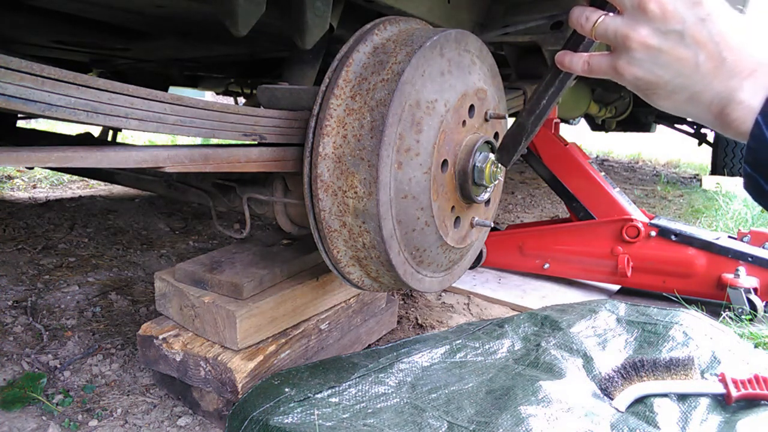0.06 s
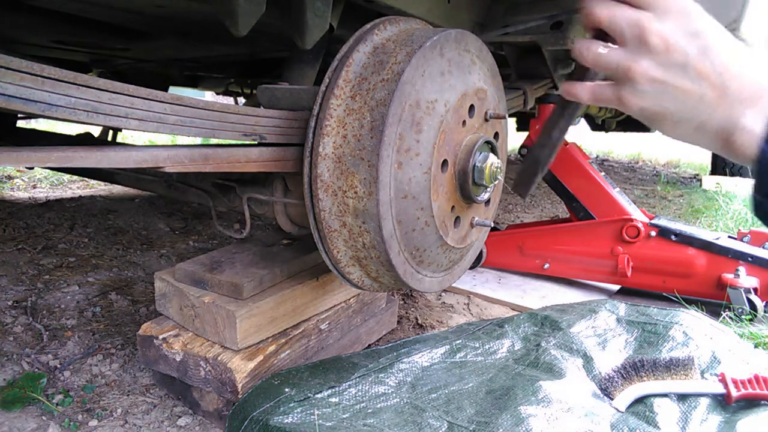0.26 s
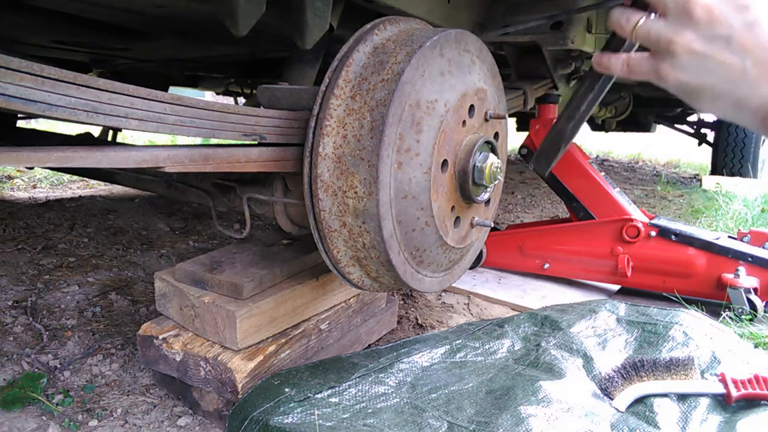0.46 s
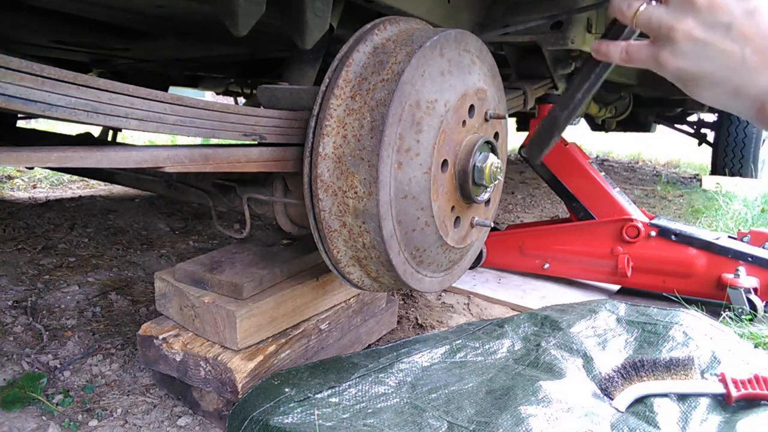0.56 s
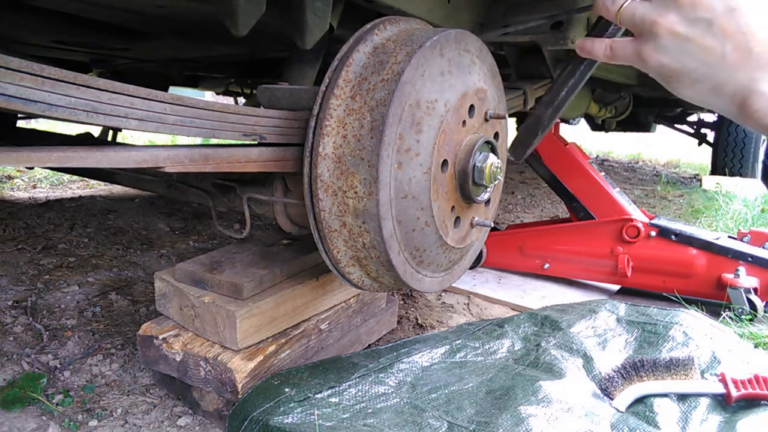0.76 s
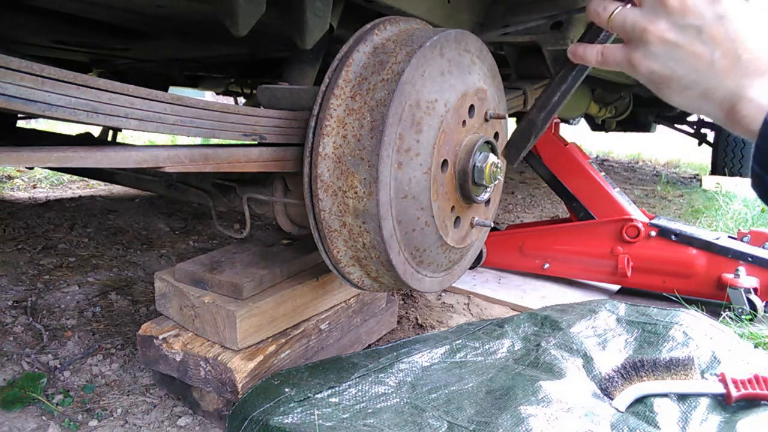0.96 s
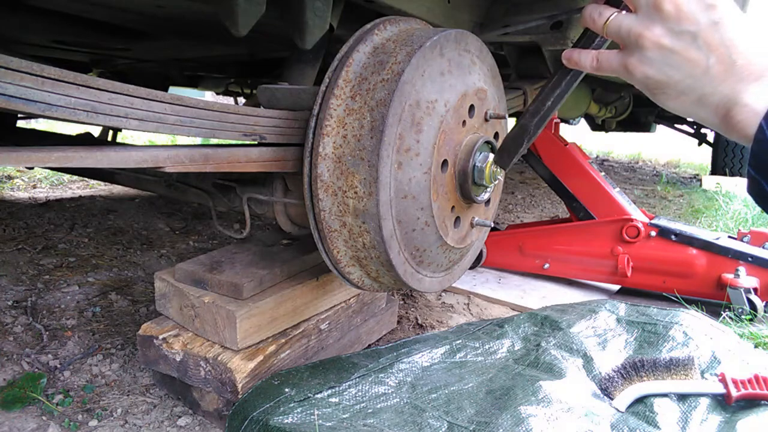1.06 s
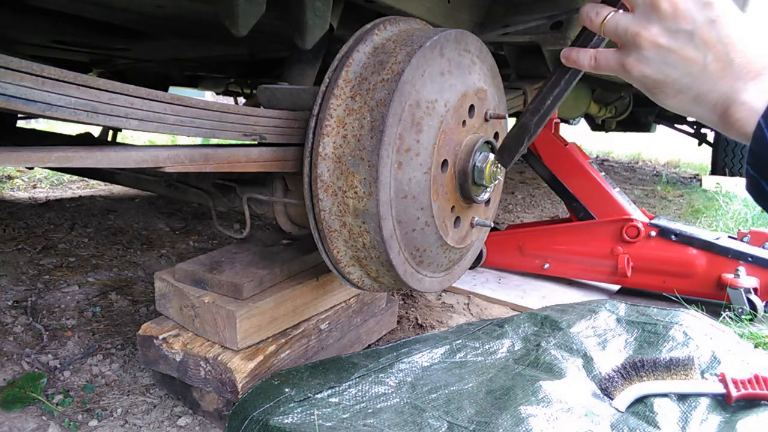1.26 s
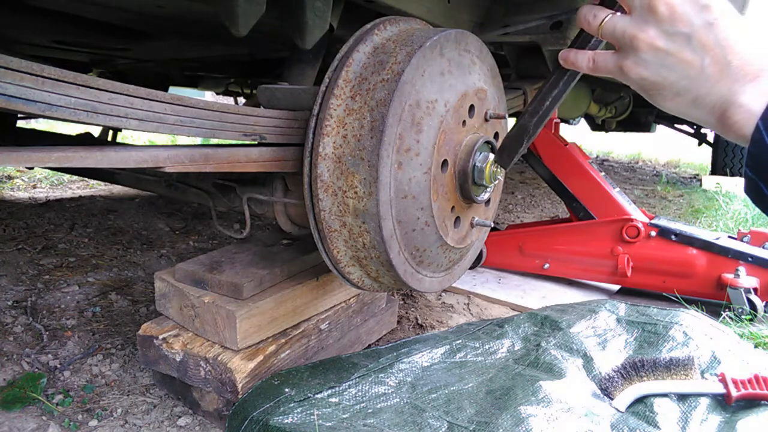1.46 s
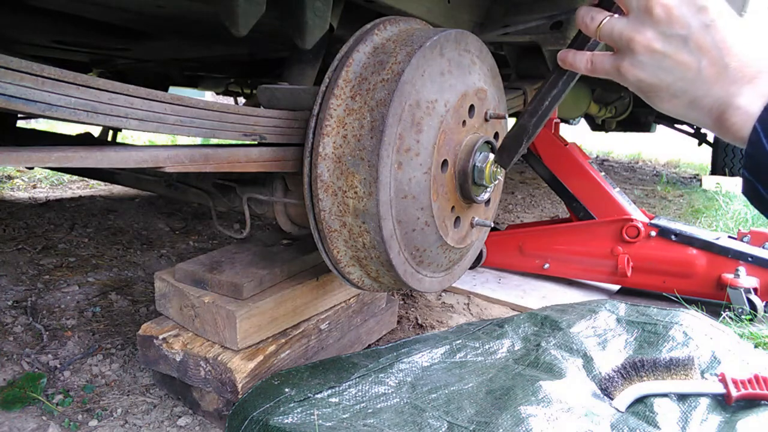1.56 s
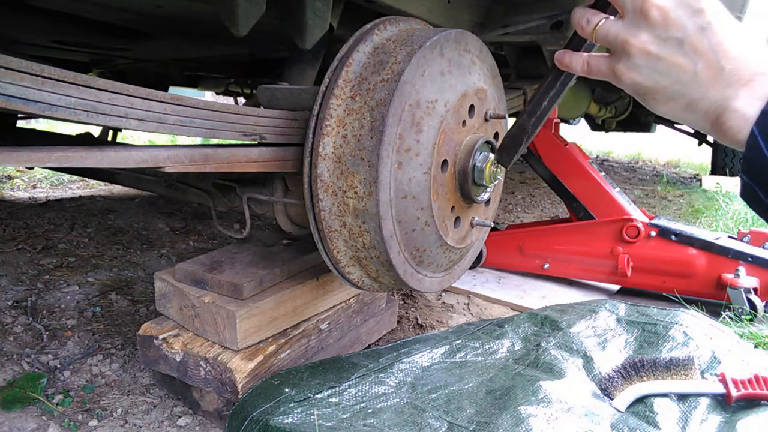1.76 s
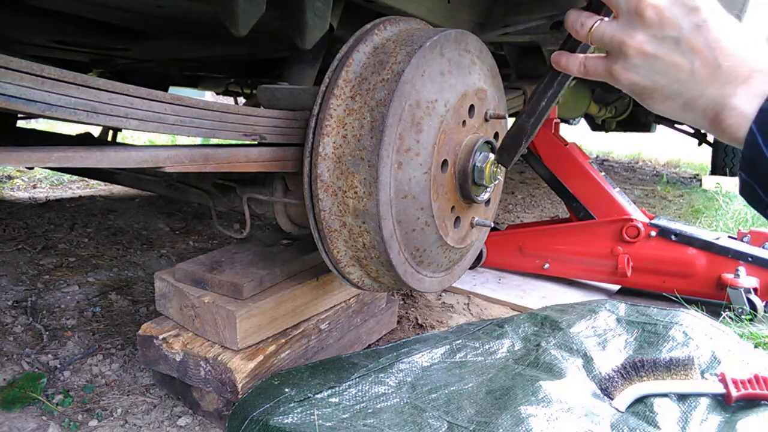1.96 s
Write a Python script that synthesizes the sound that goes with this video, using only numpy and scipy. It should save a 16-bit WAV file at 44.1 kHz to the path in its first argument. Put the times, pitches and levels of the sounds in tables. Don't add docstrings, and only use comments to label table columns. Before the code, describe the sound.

A hammer strikes a steel chisel against a hub nut with one loud, bright clang, a booming body and rattling drum; later come three faint, dull knocks over quiet outdoor rumble, picked up close.

```python
import sys
import numpy as np
from scipy import signal
from scipy.fft import rfft, irfft
from scipy.io import wavfile
from scipy.ndimage import uniform_filter1d

SR = 44100
rng = np.random.default_rng(int(sys.argv[2]) if len(sys.argv) > 2 else 0)


def decibels_to_gain(level_db):
    exponent = np.asarray(level_db, float) / 20
    return 10 ** exponent


def dump(signal):
    limited = np.clip(np.atleast_2d(signal).T, -1, 1)
    pcm = np.round(limited * 32767).astype(np.int16)
    wavfile.write(sys.argv[1], SR, pcm)


N = 88200


def read(points, hz):
    f, value = np.transpose(points)
    return np.interp(np.log(hz + 1), np.log(f + 1), value)


def evened(x):
    return x / np.sqrt(np.mean(x ** 2) + 1e-20)


def add(mix, start_s, sound):
    part = mix[:, round(start_s * SR):][:, :sound.shape[1]]
    part += sound[:, :part.shape[1]]


def noise(count, size, same, gain):
    port_lag_s = 0.0003
    frames = count * 4 // size + 5
    hz = np.fft.rfftfreq(size, 1 / SR)[:, None]
    a, b, c, d = rng.standard_normal((frames, size // 2 + 1, 4)).T
    like = np.clip(read(same, hz), 0, 1)
    left = a + 1j * b
    right = like * left + np.sqrt(1 - like ** 2) * (c + 1j * d)
    right = right * np.exp(2j * np.pi * hz * port_lag_s)
    t_s = np.arange(frames) * size / 4 / SR
    spectra = np.array([left, right]) * gain(hz, t_s)
    return signal.istft(spectra, nperseg=size, noverlap=size * 3 // 4)[1][:, :count]


def ring(modes, t, t60_scale, dull_db, rise_s, phase_rad):
    hz, db, t60_s, pan_db, lead_rad = np.array(modes).T[:, :, None]
    side = np.array([0.5, -0.5])[:, None, None]
    swell = 1 - np.exp(-t / (rise_s * 96 / hz + 1e-4))
    colour_db = db + dull_db * np.log2(hz / modes[0][0])
    level = decibels_to_gain(colour_db - 60 * t / (t60_s * t60_scale) + side * pan_db) * swell
    return (level * np.sin(2 * np.pi * hz * t + phase_rad + side * lead_rad)).sum(1)


def chisel(start_s, db, free_s, damped_t60_s, dull_db):
    bending_hz = [1674, 1681.5, 4340, 4365, 7872]
    # level/dB, t60/s, left over right/dB, left lead/rad
    bending = [(-18, 0.77, 5, .5), (-8.5, 0.38, 7, 0.95), (-2.5, 0.26, -3.5, 0.073), (-11.5, 0.3, -5, -.2),
               (-13, 0.21, -3.5, .5)]
    t = np.arange(min(N - round(start_s * SR), SR)) / SR
    damping_db = -60 * np.maximum(t - free_s, 0) / damped_t60_s
    return decibels_to_gain(db + damping_db) * ring(np.column_stack([bending_hz, bending]), t, 0.93, dull_db, 0, 0)


def hammer():
    head_hz = [6105, 8092, 8084, 8732, 10643, 10635, 11755, 11980, 12820, 13370]
    # level/dB, t60/s, left over right/dB, left lead/rad
    head = [(-28.5, .18, -10.5, 0.5), (-9, 0.15, -11.5, 2.8), (-12.5, 0.18, -12.5, -0.75),
            (-36, 0.14, 0.5, 0.1), (-18, .3, -9.5, 0.95), (-30.5, .25, 8, 5.5), (-33.5, 0.38, -9, 1.8),
            (-27, .19, -2.5, 2.4), (-31, .2, -3.5, -0.65), (-32.5, 0.14, -8, 1.9)]
    return ring(np.column_stack([head_hz, head]), np.arange(SR) / SR, 1, 0, 0, 0)


def shock(start_s, clatter_db, boom_db, t60_scale, dull_db):
    # f/Hz, level/dB, t60/s, left over right/dB, left lead/rad
    body = [(80.45, -7, 1.4, -2.5, -.2), (85.14, -1, 0.76, -1.5, 0.27), (115.1, 0.5, .4, -2, -.2),
            (147.8, -0.5, 0.33, -7, -.15), (205, -10, 1.1, -7.5, -0.51), (303.9, -4, 0.25, -1, -.2),
            (347, -14.5, 0.97, -5, -0.13), (395.3, -2.5, 0.36, -8, -1.8), (424.6, -8, .34, 1, 0.94),
            (474.7, -5.5, 0.38, -1, 0.082), (533, -4, 0.34, -0.5, -0.47), (570, -26.5, 3.4, -5, -0.46),
            (663.4, -8.5, 0.45, -1, -.8), (1100, -17, 0.57, 0.5, -1.2)]
    # f/Hz, level/dB per Hz
    clatter_colour = [(35, -29.5), (60, -6), (1530, -13.5), (1680, -17), (4060, -13.5), (4450, -12.5),
                      (7320, -18), (8020, -17), (13500, -50.5)]
    # f/Hz, t60/s
    clatter_t60 = [(80, .6), (300, 0.43), (1000, 0.25), (3000, 0.14), (7000, 0.12), (12000, 0.064)]
    # f/Hz, likeness/1
    clatter_same = [(100, 1), (400, 0.74), (1500, .5), (8000, 0.57)]
    late_db, late_stretch = -18, 3.78
    crack_db, crack_s, crack_hz = 14, 0.003, 2468
    boom_rise_s = 0.02
    count = min(N - round(start_s * SR), SR)
    t = np.arange(count) / SR

    def dying(hz, t_s):
        fall_db = -60 * t_s / (read(clatter_t60, hz) * t60_scale)
        colour_db = read(clatter_colour, hz) + dull_db * np.log2(np.maximum(hz, 300) / 300)
        return decibels_to_gain(colour_db) * (decibels_to_gain(fall_db) + decibels_to_gain(late_db + fall_db / late_stretch))

    clatter = noise(count, 512, clatter_same, dying)
    clatter = clatter / np.sqrt(np.mean(clatter[:, :2000] ** 2))
    clatter = clatter * np.minimum(t / 0.00095, 1)

    band = signal.butter(2, [crack_hz / 3, crack_hz * 1.9], "band", fs=SR, output="sos")
    crack = signal.sosfilt(band, rng.standard_normal((2, count)))
    crack = crack * np.exp(-t / crack_s) * decibels_to_gain(crack_db + 3 * dull_db)

    phases_rad = rng.uniform(0, 2 * np.pi, (len(body), 1))
    boom = ring(body, t, t60_scale, 0, boom_rise_s * t60_scale, phases_rad)
    return decibels_to_gain(clatter_db) * (clatter + crack) + decibels_to_gain(boom_db) * boom


def thud(start_s, db, swell_s, t60_scale):
    # f/Hz, level/dB, t60/s at scale 1, left over right/dB, left lead/rad
    drum = [(207.6, 0.5, 0.99, -1, -0.23), (247.4, -2.5, 1.27, -9, -0.36), (290, 3.5, 1.04, 0, -0.53),
            (376.6, -7.5, 1.6, -1, -0.61), (552, -9, 1.1, -5, -.7), (656, -6.5, 0.85, -4, -.8)]
    t = np.arange(SR // 5) / SR
    phases_rad = rng.uniform(0, 2 * np.pi, (len(drum), 1))
    swell = 1 - np.exp(-(t / swell_s) ** 2)
    return decibels_to_gain(db) * swell * ring(drum, t, t60_scale, 0, 0, phases_rad)


def air():
    # f/Hz, level/dB per Hz
    air_colour = [(18, -53.5), (30, -37), (60, -4), (160, -8.5), (403, -21), (894, -17.5), (1040, -19.5),
                  (1130, -24), (14000, -40)]
    # f/Hz, likeness/1
    air_same = [(60, 1), (230, 1), (910, 0.28), (3540, -0.05), (13800, 0.13)]
    air_db = -50.5
    drone_hz, drone_width_hz, drone_db = 154, 10, -56.5

    def lumpy(hz, t_s):
        lumps = rng.standard_normal((len(hz), len(t_s)))
        lumps = uniform_filter1d(uniform_filter1d(lumps, 5, 0), 8, 1)
        depth_db = 2.5 + 1.8 / (1 + (hz / 400) ** 2)
        return decibels_to_gain(read(air_colour, hz) + evened(lumps) * depth_db)

    def humming(hz, t_s):
        return 1 / (1 + ((hz - drone_hz) / drone_width_hz) ** 2) + 0 * t_s

    rumble = evened(noise(N, 1024, air_same, lumpy))
    drone = evened(noise(N, 4096, air_same, humming))
    return decibels_to_gain(air_db) * rumble + decibels_to_gain(drone_db) * drone


def scene():
    # t/s, level/dB, free ringing/s, damped t60/s, dulling/dB per octave
    contacts = [
        (0.2404, -6.5, 1.0, .1, 0.5),
        (1.275, -41.5, 0.135, 0.062, -5.5),
        (1.392, -46.5, 0.011, 0.018, -10),
        (1.756, -37.5, 0.0024, 0.086, -0.5),
    ]
    # t/s, clatter/dB, boom/dB, t60 scale/1, dulling/dB per octave
    shocks = [
        (0.2408, -12.5, -15.5, 0.84, 0.5),
        (0.296, -29, -20.5, 0.64, -1.5),
        (1.167, -65, -48.5, 0.47, -8),
        (1.272, -43.5, -47, 0.73, -4.5),
        (1.398, -46.5, -48.5, 0.51, -8),
        (1.756, -45.5, -55, 0.22, -1.5),
    ]
    # t/s, level/dB, swell/s, t60 scale/1
    thuds = [
        (1.278, -38.5, 0.0099, 0.16),
        (1.402, -35, .014, 0.18),
        (1.601, -48, .02, 0.138),
        (1.76, -35.5, 0.016, 0.14),
    ]
    mix = air()
    for source, rows in ((shock, shocks), (thud, thuds), (chisel, contacts)):
        for row in rows:
            add(mix, row[0], source(*row))
    add(mix, contacts[0][0], hammer())
    return mix


def low_pass(x):
    return signal.sosfilt(signal.butter(12, 14370, fs=SR, output="sos"), x)


def record(dry):
    # f/Hz, lag/s
    treble_lag = [(4900, 0.0014), (5700, .0065), (8000, .009), (13000, .0075)]
    low_cut_hz, edge_hz, ceiling = 48, 14000, 0.95
    thin = signal.sosfilt(signal.butter(3, low_cut_hz, "high", fs=SR, output="sos"), dry)
    hz = np.fft.rfftfreq(2 * N, 1 / SR)
    turn = np.exp(-2j * np.pi * np.cumsum(read(treble_lag, hz)) * hz[1])
    late = irfft(rfft(thin, 2 * N) * turn)[:, :N]
    hot = ceiling * np.tanh(late / ceiling)
    edge = signal.firwin(301, edge_hz, window=("kaiser", 8), fs=SR)
    cut = signal.oaconvolve(hot, edge[None], "same")
    return low_pass(np.clip(cut, -1, 1))


dry = scene()
out = record(dry)
dump(out)
```